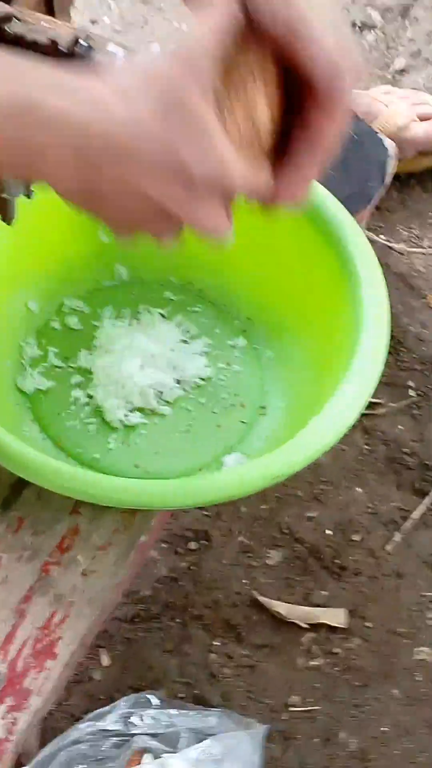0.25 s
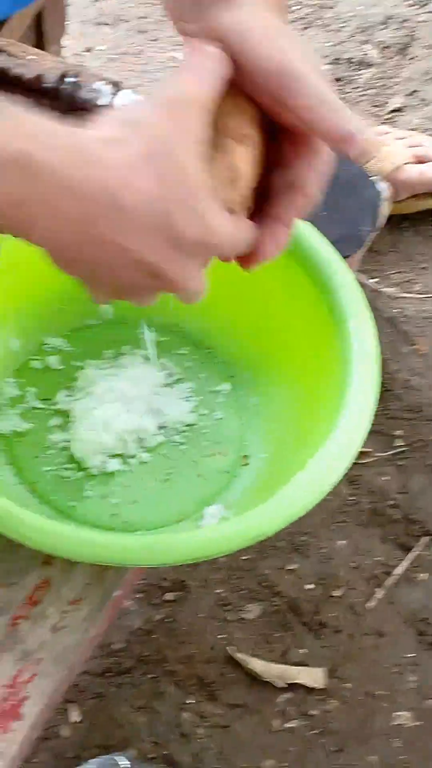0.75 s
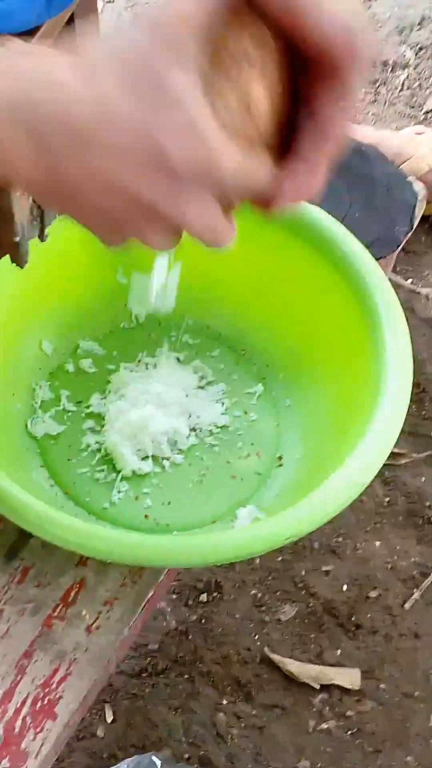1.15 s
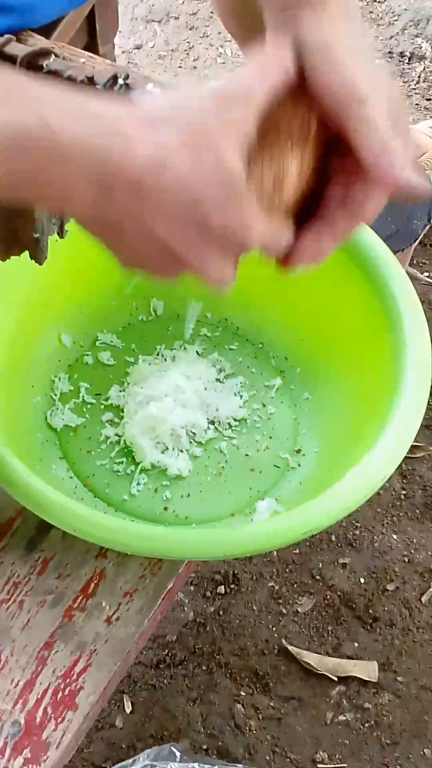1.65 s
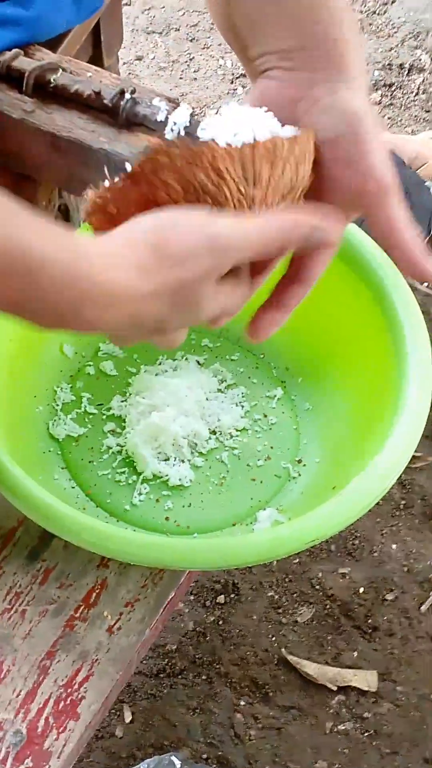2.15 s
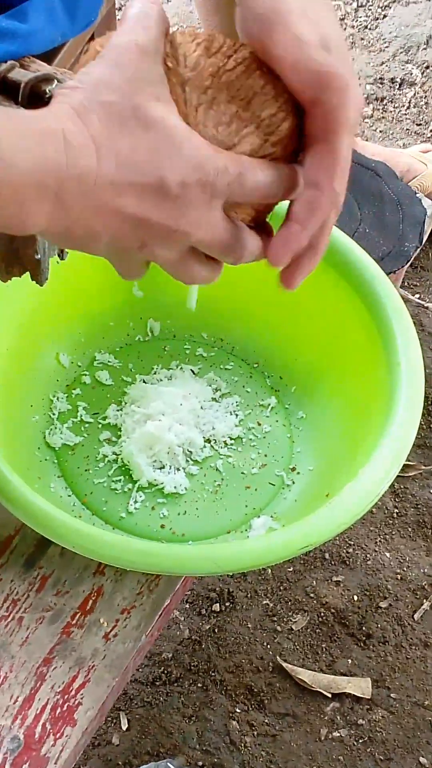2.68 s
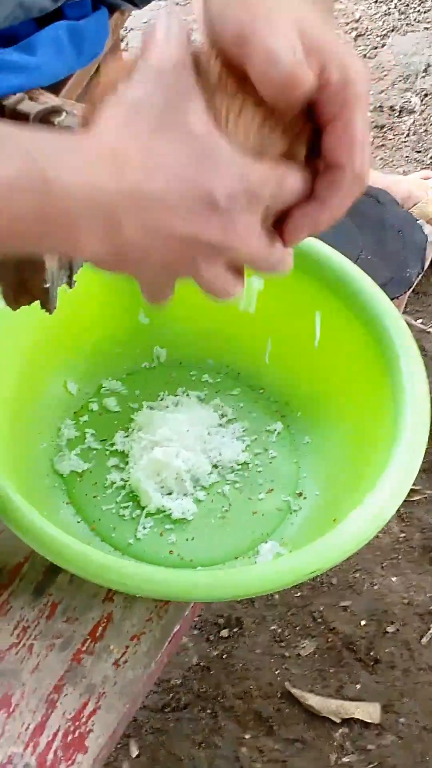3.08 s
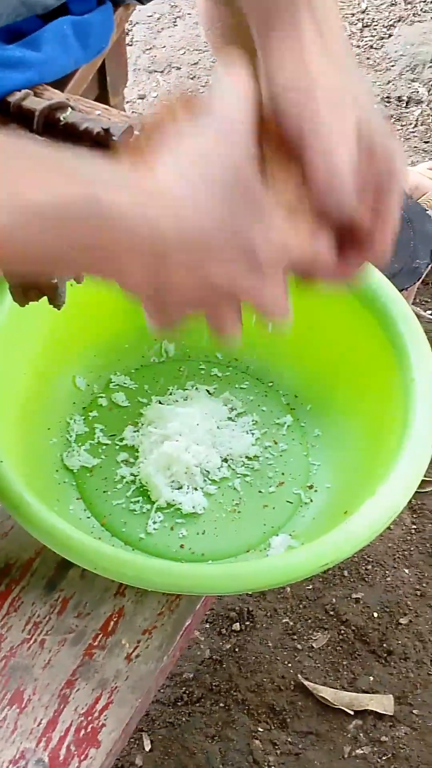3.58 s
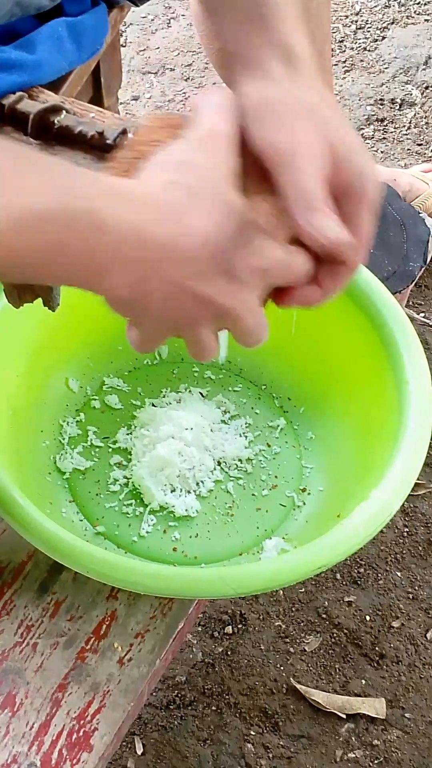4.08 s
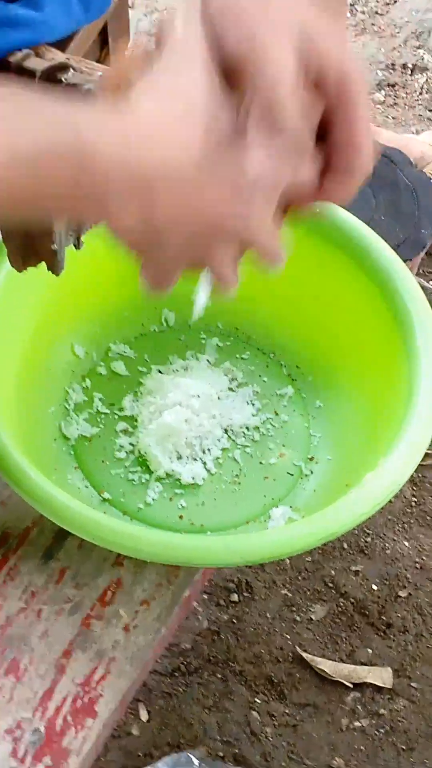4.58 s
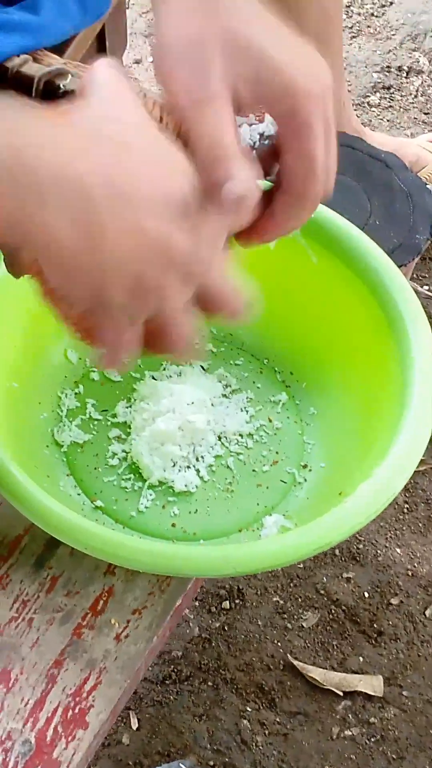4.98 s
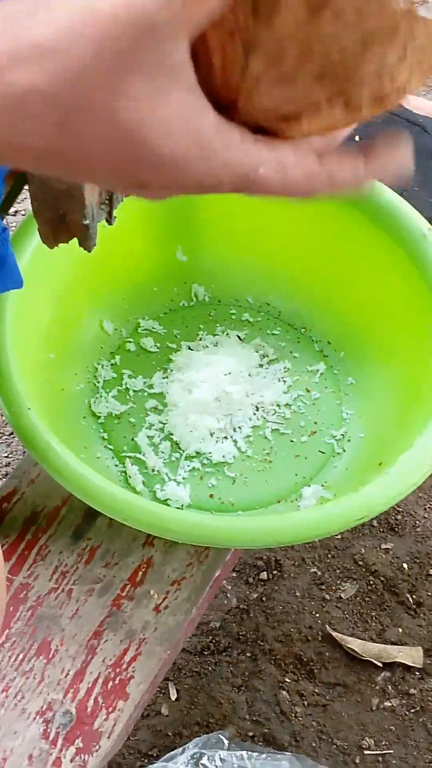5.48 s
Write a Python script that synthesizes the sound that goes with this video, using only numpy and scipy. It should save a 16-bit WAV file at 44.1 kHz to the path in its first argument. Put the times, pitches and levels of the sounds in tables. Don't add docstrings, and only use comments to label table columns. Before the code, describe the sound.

Half a coconut is scraped over a toothed steel blade in quick hollow, crunchy strokes, pausing briefly midway, in a quiet outdoor yard.

```python
import sys
import numpy as np
from scipy import signal
from scipy.io import wavfile
from scipy.ndimage import uniform_filter1d

SR = 44100
rng = np.random.default_rng(int(sys.argv[2]) if len(sys.argv) > 2 else 0)


def how_loud(loudness_db):
    steps = np.asarray(loudness_db, float) / 20
    return 10 ** steps


def int16_out(signal):
    q = np.round(np.clip(np.atleast_2d(signal).T, -1, 1) * 32767)
    wavfile.write(sys.argv[1], SR, q.astype(np.int16))


N = 253045

# [bite t/s, dig-in/s, hold/s, time to fade 30 dB/s, tearing level/dB]
STROKES = [(0.077, 0.056, .11, 0.09, -32), (0.434, 0.026, 0.085, 0.12, -31),
           (0.73, 0.03, 0.099, 0.1, -33.5), (1.013, 0.032, 0.087, 0.1, -29.5),
           (1.297, 0.032, 0.072, .09, -30.5), (1.584, 0.031, 0.079, 0.11, -33.5),
           (1.869, .025, 0.11, .08, -33.5), (2.157, 0.033, 0.081, .08, -32.5),
           (2.445, 0.015, 0.094, 0.03, -33.5), (2.715, .03, 0.074, 0.0862, -32.5),
           (3.327, 0.041, 0.093, 6, -51), (3.443, 0.0096, 0.029, 0.22, -52.5),
           (3.706, 0.058, 0.067, 0.1, -35.5), (4.02, 0.045, 0.064, 0.11, -32),
           (4.326, 0.021, 0.07, 0.13, -34), (4.627, 0.012, 0.094, 0.12, -36),
           (4.943, 0.014, 0.05, 0.13, -36.5), (5.19, 0.034, 0.044, 0.1246, -31.5),
           (5.49, 0.012, 0.035, 3, -37.5), (5.536, 0.011, 0.074, 0.08, -35.5)]
# [cup level/dB, its change over the hold/dB, bite knock level/dB, upper wall level/dB, lower wall level/dB]
GRIPS = [(-33, -1, -57, 5, 1), (-30, -0.5, -29, 4.5, 4.5), (-26.5, -6, -19.5, -1, 5),
         (-24.5, -6.5, -21, 0, 0.5), (-23, -1.5, -18.5, -4.5, -7), (-22, -6, -28, -4, -1.5),
         (-24.5, -6, -19, -4, -1.5), (-23, 0, -23, -5.5, -17), (-22.5, -2, -11, -6, -3.5),
         (-22.5, -2, -42, -6, -9.5), (-47, -7, -56, -23, 3), (-43, -9, -73, -9, 7),
         (-24, -4.5, -55, -9.5, -23), (-21.5, -10, -15.5, -3.5, -3), (-25.5, -3.5, -17, -4, -3.5),
         (-23.5, -5.5, -15, -3.5, -10), (-25, 0, -13.5, -8.5, -4.5), (-22, -5, -20, 0.5, -2),
         (-24.5, 1, -16.5, -3, -12), (-20, -11.5, -45, -5, -3.5)]
# [t/s, knock level/dB]
CATCHES = [(0.111, -27), (0.454, -20), (0.531, -15.5), (0.752, -16), (1.035, -17), (1.085, -11),
           (1.324, -25), (1.613, -8), (1.888, -14.5), (1.902, -9.5), (2.477, -7), (2.513, -25),
           (2.745, -9.5), (2.806, -16.5), (3.744, -17), (3.772, -5.5), (4.05, -8.5), (4.068, -17),
           (4.089, -3), (4.117, -8.5), (4.352, -20), (4.368, -13), (4.398, -9.5), (4.666, -4),
           (4.689, -6.5), (4.974, -12), (5.213, -8), (5.239, -10.5), (5.541, -6.5)]
# [t/s, knock level/dB]
SNAGS = [
    (3.279, -40.5),
    (3.408, -33),
    (3.458, -31),
    (4.468, -25),
    (4.761, -17),
    (5.317, -18.5),
    (5.64, -29),
]
USUAL_TEARING_DB = -33


def rms_one(x):
    return x / np.sqrt(np.mean(x ** 2) + 1e-20)


def lowpass(x, order, hz):
    return signal.sosfilt(signal.butter(order, hz, fs=SR, output="sos"), x)


def highpass(x, order, hz):
    return signal.sosfilt(signal.butter(order, hz, "high", fs=SR, output="sos"), x)


def drift(rate):
    r = np.exp(-40 * np.pi * rate / SR)
    coarse = rng.standard_normal(N // 20 + 2002)
    slow = signal.lfilter([1], [1, -2 * r, r * r], coarse)[2000:]
    return np.interp(np.arange(N) / 20, np.arange(len(slow)), rms_one(slow))


def resonate(x, modes):
    out = 0
    for k, (hz, width_hz, db) in enumerate(modes):
        r = np.exp(-np.pi * max(width_hz, 5) / SR)
        zeros = [(1 - r * r) / 2, 0, (r * r - 1) / 2]
        poles = [1, -2 * r * np.cos(2 * np.pi * hz / SR), r * r]
        out = out + (-1) ** k * how_loud(db) * signal.lfilter(zeros, poles, x + 1e-18)
    return out


def colour(x, spectrum, patchy_db, rate, count):
    hz, db = np.transpose(spectrum)
    edges, out = np.geomspace(hz[0], hz[-1], count + 1), 0
    for k, (low, high) in enumerate(zip(edges, edges[1:])):
        band = signal.sosfilt(signal.butter(2, [low, high], "band", fs=SR, output="sos"), x[k % 2])
        level_db = np.interp(np.log(low * high) / 2, np.log(hz), db)
        out = out + band * how_loud(level_db + patchy_db * drift(rate))
    return rms_one(out)


def crunch(clicks, spectrum, cycles, patchy_db, count):
    hz, db = np.transpose(spectrum)
    step = np.log(hz[-1] / hz[0]) / count
    pitches = hz[0] * np.exp(step * (np.arange(count) + rng.random(count)))
    dealt, out = rng.integers(0, count, N), 0
    for k, mode_hz in enumerate(pitches):
        level_db = np.interp(np.log(mode_hz), np.log(hz), db)
        share = clicks * (dealt == k) * how_loud(patchy_db * drift(16.5))
        out = out + resonate(share, [(mode_hz, mode_hz / cycles, level_db)])
    return rms_one(out)


def slips(per_s, spread_db, count):
    sizes_db = spread_db * np.minimum(rng.exponential(1, (count, N)), 4)
    sizes = how_loud(sizes_db) * rng.choice([-1, 1], (count, N))
    return rms_one(sizes * (rng.random((count, N)) < per_s / SR))


def strikes(rows, lift_db, cut_hz):
    clicks = np.zeros(N)
    clicks[(rows[:, 0] * SR).astype(int)] = how_loud(rows[:, 1] + lift_db)
    return lowpass(clicks + 1e-18, 2, cut_hz)


def evened(x, span_s):
    return rms_one(x / np.sqrt(uniform_filter1d(x ** 2, size=round(span_s * SR)) + 1e-12))


def moving_air():
    # [f/Hz, level per Hz/dB]
    spectrum = [(18, -9), (60, -1), (230, -3), (330, -8), (600, -18), (1400, -20.5), (3400, -24.5),
                (5500, -36), (9000, -56), (16300, -51)]
    # [t/s, low air level/dB, upper air level/dB], both re their mean
    rumble = [(0.001, 2, 5.5), (.5, -2, 7), (1.1, 2.5, 8), (2.5, 2.5, .5), (2.92, 2.5, 2.5),
              (3.05, -2, -5.5), (3.29, -1, -2), (3.5, 0, 3.5), (4.1, 3, 5.5), (5.2, 5.5, -0.5),
              (5.73, -1.5, 3)]
    air = how_loud(-61.5 + 5.0) * colour(rng.standard_normal((2, N)), spectrum, patchy_db=2.0, rate=2.6, count=20)
    s, *levels_db = np.transpose(rumble)
    low, upper = (how_loud(np.interp(np.arange(N) / SR, s, db)) for db in levels_db)
    return low * lowpass(air, 3, 420) + upper * highpass(air, 3, 420)


def insects():
    # [f/Hz, width/Hz, level/dB]
    bands = [(8700, 1600, 0), (3480, 200, -10)]
    return how_loud(-66.0) * rms_one(resonate(rng.standard_normal(N), bands)) * how_loud(1.0 * drift(5.9))


def hums():
    # [start t/s, end t/s, start f/Hz, end f/Hz, level/dB]
    tones = [
        (2.33, 2.446, 805, 850, -56),
        (2.96, 3.055, 860, 835, -66),
        (3.104, 3.246, 455, 480, -60),
        (3.539, 3.66, 448, 420, -61),
        (3.546, 3.723, 1040, 1040, -66),
        (4.42, 4.615, 1550, 1640, -58),
        (4.48, 4.616, 205, 230, -50),
        (0.0011, 0.12, 250, 260, -56),
    ]
    out, waver = np.zeros(N), drift(31)
    for start, end, start_hz, end_hz, db in tones:
        a, b = round(start * SR), round(end * SR)
        hz = np.linspace(start_hz, end_hz, b - a) * (1 + 0.005 * waver[a:b])
        swell = how_loud(3 * waver[::-1][a:b]) * np.sqrt(np.hanning(b - a))
        out[a:b] += how_loud(db) * swell * np.sin(2 * np.pi * np.cumsum(hz) / SR)
    return out


def flares():
    s, db = np.transpose(CATCHES + SNAGS)
    decay_s = 0.0055
    kicks = np.zeros(N)
    kicks[(s * SR).astype(int)] = np.maximum(2.5 + 0.25 * (db + 12), 0)
    return signal.lfilter([1], [1, -np.exp(-1 / (decay_s * SR))], kicks + 1e-18)


def stroke_controls():
    def column(values):
        return np.array(values)[:, None]

    dig_wait = column((.02, 0.13, 0.27))
    dig_curve = column((0.79, 1.2, 1.2))
    # [tearing/dB, hiss/dB]
    hold_climb_db = (1.5, -1)
    change_share = column((0.69, 1, 0.84))
    fade_speed = column((1.36, 1, 0.87))
    bite_under_db, slow_bite_db_per_s = column([6, 4, 1.5]), 325
    drag_under_db, drag_db_per_s = column([32, 19, 20]), column([150, 122, 90])
    rest_s, rest_db = .035, column([-62, -61.5, -64])

    out = np.full((3, N), -90.)
    starts = [round(row[0] * SR) for row in STROKES] + [N]
    for k, (stroke, grip) in enumerate(zip(STROKES, GRIPS)):
        _, dig, hold, fade, tear_db = stroke
        cup_db, change_db = grip[:2]
        age = np.arange(starts[k + 1] - starts[k]) / SR
        hiss_db = -38 + 0.8 * (tear_db - USUAL_TEARING_DB)
        full = column([cup_db, tear_db, hiss_db])
        to_go = np.clip((1 - age / dig) / (1 - dig_wait), 0, 1)
        climb = -(bite_under_db + slow_bite_db_per_s * dig) * to_go ** dig_curve
        held = column([change_db, *hold_climb_db]) * np.clip((age - dig) / hold / change_share, 0, 1)
        after = np.maximum(age - dig - hold, 0)
        fading = fade_speed * after / fade * 30
        letting_go = -np.minimum(fading, drag_under_db + drag_db_per_s * after)
        out[:, starts[k]:starts[k + 1]] = full + climb + held + letting_go
        if tear_db > -45:
            resting = slice(starts[k] - round(rest_s * SR), starts[k])
            out[:, resting] = np.maximum(out[:, resting], rest_db)
    out[1:] += flares()
    return uniform_filter1d(out, size=40)


def wet_fibres():
    # [f/Hz, level per Hz/dB]
    spectrum = [(3900, -8), (4840, -6), (5300, -8), (6500, -8), (7840, -4), (8900, 0), (10100, -3),
                (11800, -17), (15200, -21), (16300, -22)]
    finer = slips(9000, 1.7, count=2)
    smooth = colour(finer, spectrum, 1.8, 45, count=12)
    rings = crunch(finer[1], spectrum, 90, 2.8, count=44)
    return how_loud(-5.5) * smooth + how_loud(-4.5) * rings


def shell_and_bench(shell_db, judder):
    # [f/Hz, width/Hz, level/dB]
    cup_modes = [(503, 80, 0), (552, 80, 1)]
    # [f/Hz, width/Hz, level/dB]
    upper_modes = [(671, 47.4, -0.5), (746.5, 65, -2.5), (823, 35, -9)]
    # [f/Hz, width/Hz, level/dB]
    lower_modes = [(470.6, 20.7, 6.5), (356, 140, -13)]
    # [f/Hz, width/Hz, level/dB]
    bench_modes = [(260.2, 47.6, 4), (156, 67, -1.5), (102, 61, -3)]
    # [f/Hz, width/Hz, level/dB]
    knock_modes = [(581, 44, -0.5)]
    strokes, grips = np.array(STROKES), np.array(GRIPS)
    t = np.arange(N) / SR
    stroke = np.maximum(np.searchsorted(strokes[:, 0], t + .01) - 1, 0)
    bench_db = -42 + 0.3 * (strokes[:, 4] - USUAL_TEARING_DB) - grips[:, 0]
    upper, lower, bench = (uniform_filter1d(how_loud(db[stroke]), size=400)
                           for db in (grips[:, 3], grips[:, 4], bench_db))

    tugs = slips(2500, 1.5, count=4)
    mode_sets = (cup_modes, upper_modes, lower_modes, bench_modes)
    cup, wall, low_wall, wood = (evened(resonate(x, modes), 0.035) for x, modes in zip(tugs, mode_sets))
    body = cup + how_loud(-1.5) * upper * wall + how_loud(-2.5) * lower * low_wall + how_loud(6.5) * bench * wood
    body = how_loud(shell_db - 4.5) * judder * body

    bite = strikes(np.c_[strokes[:, 0], grips[:, 2]], 33.3, 1350)
    catch = strikes(np.array(CATCHES + SNAGS), 36.1, 800)
    body += resonate(catch, cup_modes) + resonate(bite, knock_modes)
    body += resonate(how_loud(-6.0) * upper * (bite + catch), upper_modes)
    body += resonate(how_loud(1.0) * bench * (bite + catch), bench_modes)
    return body


def teeth(tear_db, judder):
    # [f/Hz, width/Hz, level/dB]
    blade = [(1013, 17, -10.5), (1187, 10, -14), (1792, 77, -4.5), (1939, 24, -5), (2136, 37, -7.5),
             (3780, 34, -15.5)]
    # [f/Hz, level per Hz/dB]
    spectrum = [(850, -3), (1300, -5.5), (1650, -9.5), (1900, -4), (2450, -6), (3100, -6.5), (3750, -4),
                (4150, -80)]
    fine = slips(4500, 3.66, count=2)
    tearing = how_loud(tear_db) * judder
    ring = resonate(tearing * fine[0] * how_loud(14.5), blade)
    rasp = how_loud(-7.5) * colour(fine, spectrum, 4.84, 29.6, count=10)
    rasp = rasp + how_loud(-5.0) * crunch(fine[1], spectrum, 56, 2.54, count=32)
    rasp = lowpass(rasp, 4, 4100)
    return ring + tearing * rasp


def grating(wet_crunch):
    shell_db, tear_db, hiss_db = stroke_controls()
    judder = how_loud(1.73 * drift(28))
    hiss = how_loud(hiss_db) * judder * wet_crunch
    return shell_and_bench(shell_db, judder) + teeth(tear_db, judder) + hiss


def taps(wet_crunch):
    # [t/s, scuff level/dB, thud
    # level re scuff/dB, tock level re scuff/dB]
    contacts = [(0.398, -52.5, 24, 9), (0.686, -38, 11, 3.5), (0.704, -36.5, -1, -6), (0.976, -35, 8.5, 3),
                (1.272, -48, 21, 12), (1.554, -38.5, 16, 1), (1.8383, -31, 5, 0.5),
                (2.1187, -29.5, 3.5, -2), (2.619, -52, 7, 10), (3.115, -62, -6, 13), (3.986, -41.5, 10, 4),
                (4.299, -35.5, 1, -11), (4.596, -33, 2, 1), (4.607, -44, 25.5, 2.5), (4.929, -45, 16, 0),
                (5.1425, -37, 12, -1), (5.1498, -32, 0, 2.5), (5.163, -39, 10.5, 4), (5.46, -40.5, 10.5, 2)]
    # [t/s, level/dB]
    clacks = [
        (0.431, -33),
        (0.6937, -22.5),
        (0.973, -34),
        (1.839, -55),
        (2.122, -30),
        (4.596, -49),
        (4.605, -36),
        (5.141, -44),
    ]
    # [t/s, scuff level/dB, length/s]
    fingers = [
        (3.042, -59, 0.0068),
        (3.267, -43.5, .007),
        (3.572, -68, 0.0035),
        (3.618, -42, 0.026),
        (5.504, -17, 0.0054),
        (5.714, -44, 0.014),
    ]
    touches = [(*row, 0.013) for row in contacts]
    touches += [(s, db, -27, -7, length) for s, db, length in fingers]
    envelopes = np.zeros((3, N))
    for s, db, thud_db, tock_db, length in touches:
        at = round(s * SR)
        age = np.arange(min(N - at, 5000)) / SR
        fade = np.exp(-(age / max(length, .001)) ** 2) + 0.033 * np.exp(-age / 0.0047)
        levels_db = db - 12.5 + np.array([[0], [thud_db], [tock_db]])
        envelopes[:, at:at + len(fade)] += how_loud(levels_db) * fade
    grit = slips(3000, 2.6, count=2)
    thud = rms_one(resonate(grit[0], [(250, 66, 11.0), (520, 580, -6.5)]))
    tock = rms_one(resonate(grit[1], [(1490, 160, 0.0), (2000, 400, 1.5), (3240, 1200, -3.5)]))
    rim = strikes(np.array(clacks), 22.0, 3000)
    clack = resonate(rim, [(1520, 75, 7.9), (1060, 610, 3.0), (620, 270, -8.0)])
    uneven = how_loud(2.5 * drift(120))
    return clack + np.sum(envelopes * uneven * [wet_crunch, thud, tock], axis=0)


def yard(x, t60, cut_hz):
    t = np.arange(round(.4 * SR)) / SR
    tail = rng.standard_normal(len(t)) * how_loud(-60 * t / t60) * (t > .004)
    tail = lowpass(tail, 1, cut_hz)
    return signal.fftconvolve(x, tail / np.linalg.norm(tail))[:N]


def scene():
    wet_crunch = wet_fibres()
    work = grating(wet_crunch) + taps(wet_crunch)
    work = highpass(work, 2, 70)
    scatter = how_loud(-17.5) * yard(work, t60=0.2, cut_hz=1860)
    return (moving_air() + insects() + hums() + work + scatter)[None]


def top_cut(x):
    return signal.sosfilt(signal.butter(12, 16600, fs=SR, output="sos"), x)


def record(dry):
    overload = 0.32
    rounded = overload * np.tanh(dry / overload)
    cut = signal.sosfilt(signal.ellip(12, .5, 65, 15760, fs=SR, output="sos"), rounded)
    return top_cut(cut)


dry = scene()
out = record(dry)
int16_out(out)
```